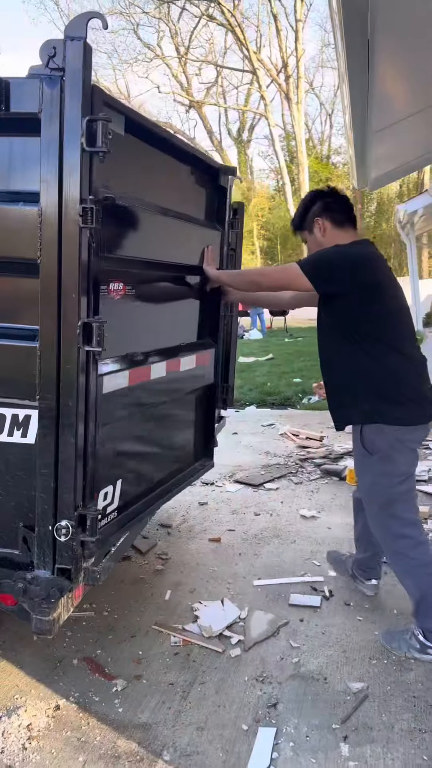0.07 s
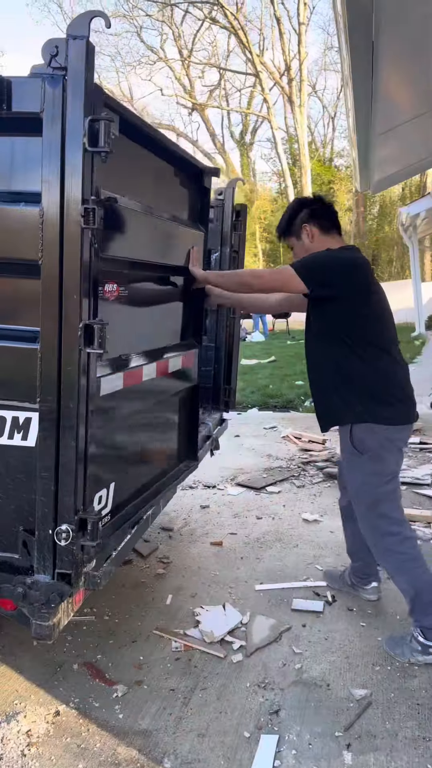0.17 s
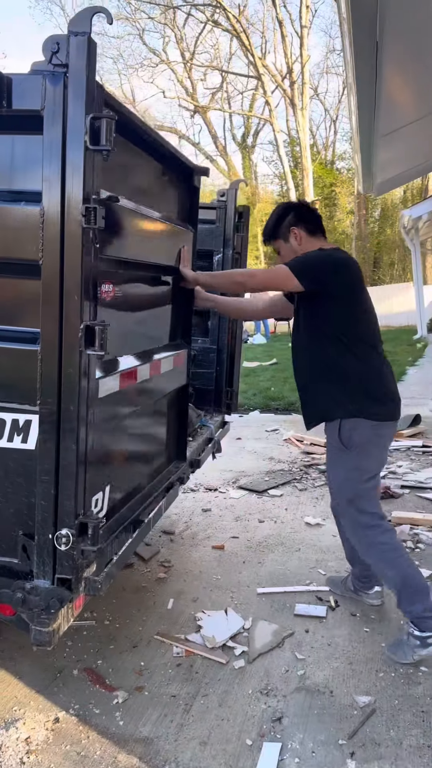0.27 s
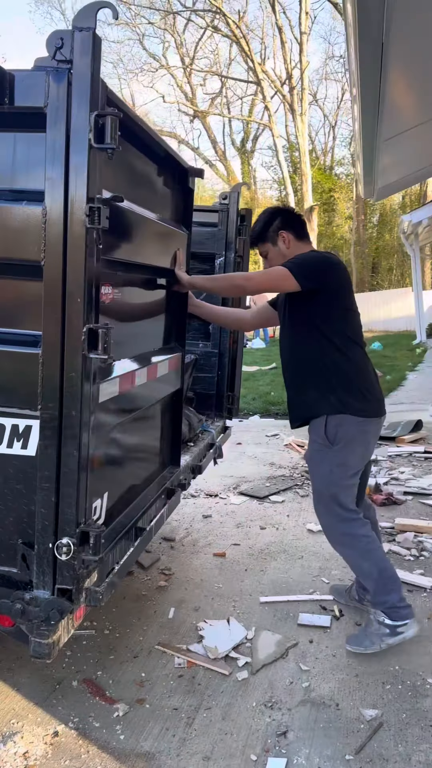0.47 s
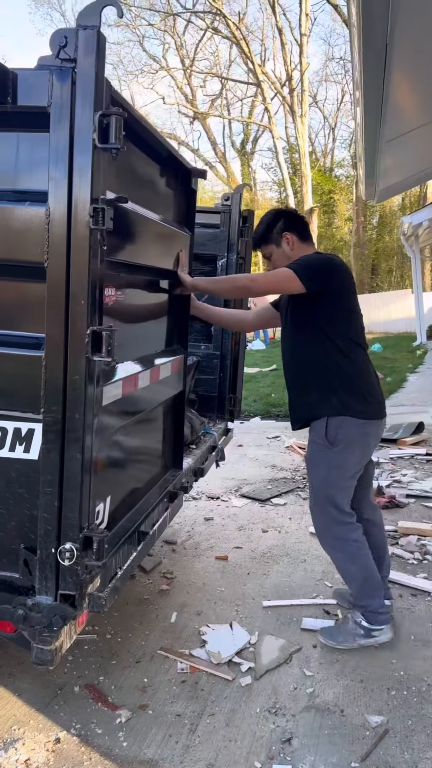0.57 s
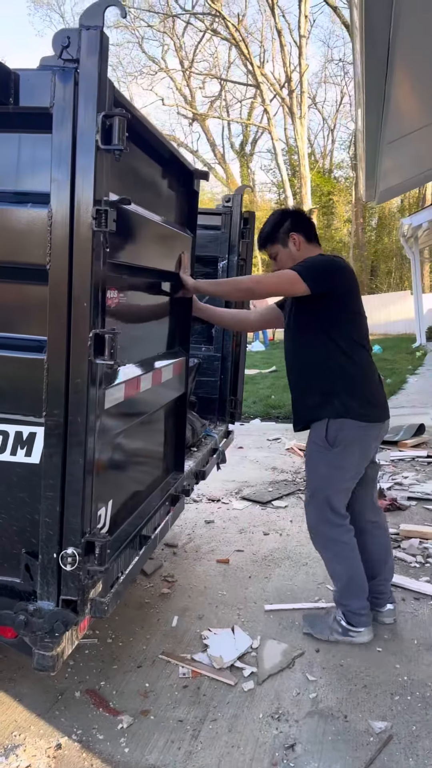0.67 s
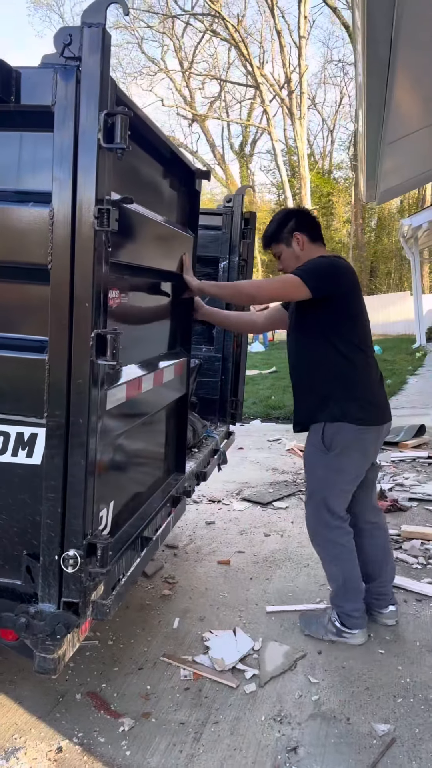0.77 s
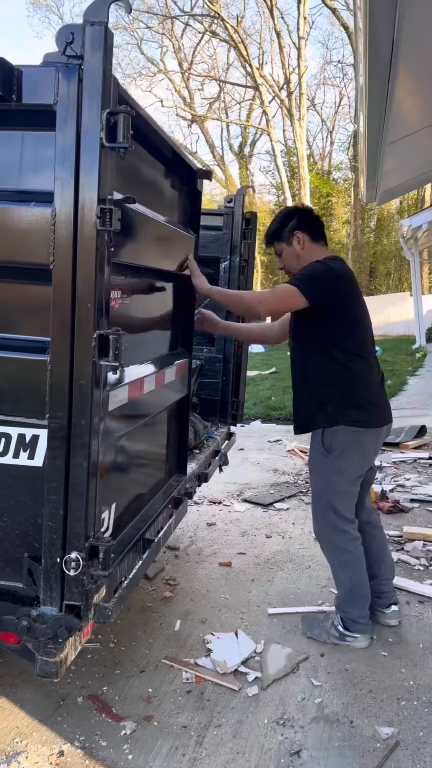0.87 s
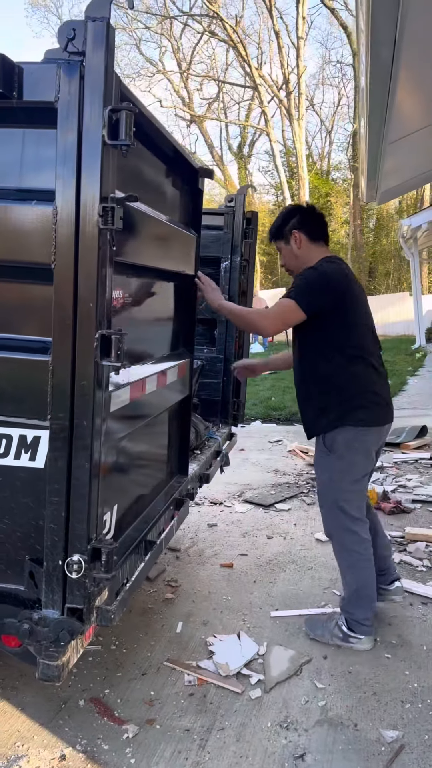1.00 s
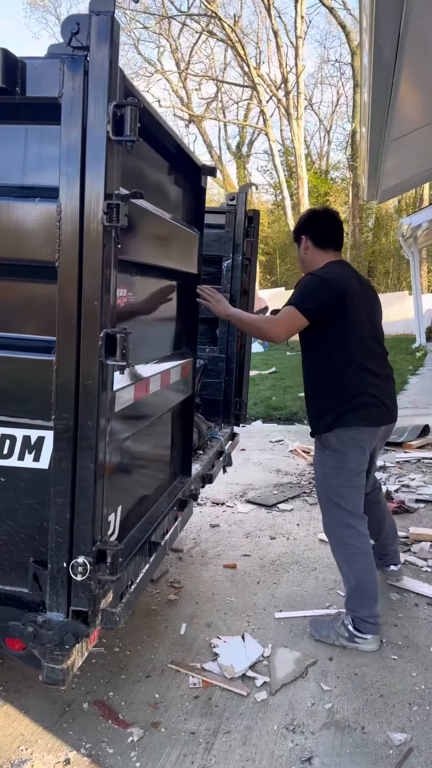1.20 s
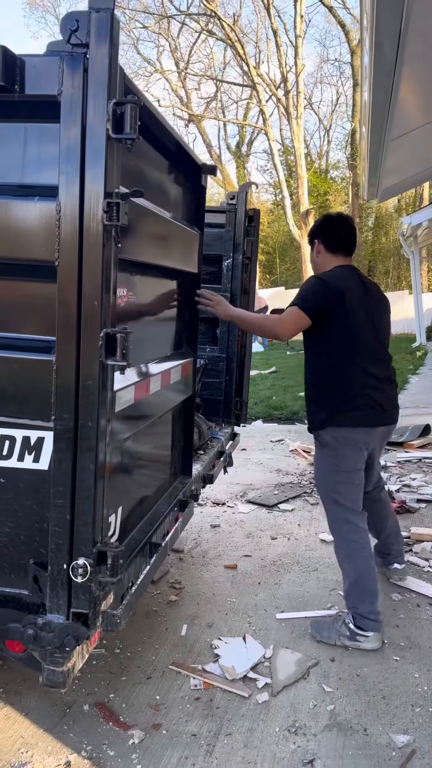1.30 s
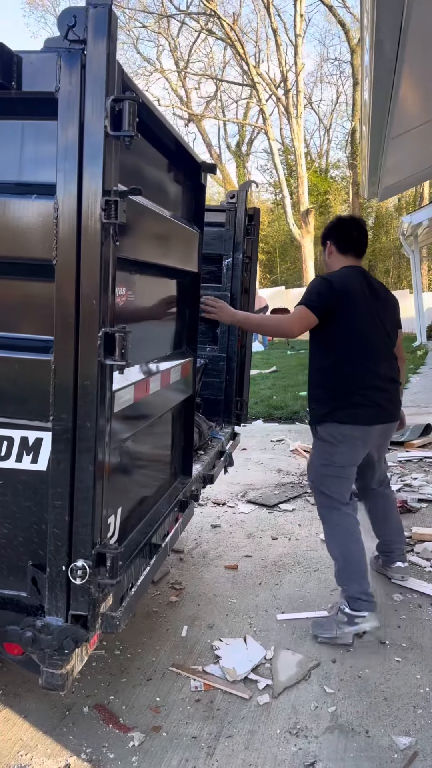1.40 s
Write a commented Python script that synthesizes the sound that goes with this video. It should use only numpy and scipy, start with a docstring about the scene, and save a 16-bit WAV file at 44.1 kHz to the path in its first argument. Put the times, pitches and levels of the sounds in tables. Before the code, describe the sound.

A heavy steel trailer door slams shut at about 0.25 seconds with a crack and a deep boom, just after faint gritty shoe scrapes. It chatters against its frame until 0.5 seconds, panels and loose hardware ringing and fading. Faint latch clanks come around 0.9 seconds, a short scrape at 1.2, and two more light clanks near 1.4. A low outdoor rumble runs underneath.

```python
"""Steel trailer door slam

A heavy steel trailer door is pushed shut outdoors: a brief rush swells into a crack and a boom, then it
chatters for a quarter second, rebounding on its frame, ringing the panels and shaking the loose hardware.
Small latch clanks follow. Gritty shoe scrapes come before and after, over a low outdoor rumble."""
import sys
import numpy as np
from scipy import signal
from scipy.fft import rfft, irfft, next_fast_len
from scipy.io import wavfile

SR = 44100
rng = np.random.default_rng(int(sys.argv[2]) if len(sys.argv) > 2 else 0)


def int16_out(signal):
    """Quantize to a 16-bit WAV file."""
    q = np.round(np.clip(np.atleast_2d(signal).T, -1, 1) * 32767)
    wavfile.write(sys.argv[1], SR, q.astype(np.int16))


N = 63945
T = np.arange(N) / SR
UNEVEN_DB = 1.5   # spread in strength of dense modes
CHATTER_PER_S = 450


# Each row: frequency in Hz, density in dB.
CRACK_SPECTRUM = [(500, -7), (3400, -1), (5000, -13.5), (7000, -16), (9000, -39.5)]
# Each row: frequency in Hz, level in dB.
EDGE_MODES = [(735, -11), (1320, -11.5), (1620, -16), (1850, -13.5)]
SLAM_S, EDGE_T60_S = 0.2437, 0.055
CRACK_DB, CRACK_RISE_S, CRACK_T60_S = -10, 0.0032, 0.045

def slam():
    """First contact: a crack that sweeps down into a thud and briefly rings the door's edge."""
    attack = np.minimum(T / CRACK_RISE_S, 1) ** 2
    fall = np.interp(T - CRACK_RISE_S, T, decay(CRACK_T60_S))
    crack = from_db(CRACK_DB) * noise(CRACK_SPECTRUM, UNEVEN_DB) * attack * fall
    edge = 0
    for hz, db in EDGE_MODES:
        arrival_s = SLAM_S + TRAVEL_1KHZ_S * np.sqrt(1000 / hz)
        edge += mode(hz, EDGE_T60_S, [arrival_s], [db])
    return strike(contacts([SLAM_S], [0]), crack + bending_wave()) + edge


# Each row: frequency along the sweep in Hz, level in dB.
SWEEP_LEVELS = [(110, -14.5), (1000, -11), (3500, -10), (9000, -34.5)]
TRAVEL_1KHZ_S = 0.0066

def bending_wave():
    """Highs travel faster through steel than lows, so one blow arrives as a quick downward sweep."""
    hz = 1000 * (TRAVEL_1KHZ_S / (T + 1 / SR)) ** 2
    low_hz, high_hz = SWEEP_LEVELS[0][0], SWEEP_LEVELS[-1][0]
    in_band = (hz > low_hz) & (hz < high_hz)
    fade = np.clip(hz / low_hz - 1, 0, 1)
    sweep = np.sin(2 * np.pi * np.cumsum(hz * in_band) / SR)
    return in_band * fade * from_db(at_hz(SWEEP_LEVELS, hz)) * sweep


# Each row: start in seconds, level in dB.
BOX_HEAVES = [(0.25, -13), (.45, -27.5), (0.611, -24.5)]
BOOM_HZ, BOOM_RISE_S, BOOM_T60_S = 61.4, 0.008, 0.413

def boom():
    """The whole trailer box heaves in one low mode."""
    tone = np.sin(2 * np.pi * BOOM_HZ * T) * np.minimum(T / BOOM_RISE_S, 1) * decay(BOOM_T60_S)
    return strike(contacts(*np.transpose(BOX_HEAVES)), tone[None])


# Each row: start in seconds, panel level in dB, frame level in dB, hardware level in dB.
DOOR_BLOWS = [(0.2495, -16.5, -20, -45), (.258, -23.5, -28, -25), (.272, -16.5, -15.5, -22.5),
              (0.284, -27.5, -25.5, -16), (.306, -19.5, -17, -21), (.320, -23, -15, -18.5),
              (0.334, -25.5, -22, -23.5), (.352, -37, -16.5, -22.5), (.374, -28.5, -22.5, -28.5),
              (.395, -29.5, -22, -22), (.426, -26, -17.5, -27.5), (.441, -28.5, -23, -29),
              (0.457, -31.5, -32.5, -48), (.479, -30.5, -32.5, -28.5), (.590, -35.5, -49.5, -67)]
# Dense modes of each part. Each row: frequency in Hz, density in dB.
PANEL_SPECTRUM = [(70, -7), (200, -4.5), (320, -6.5), (480, -7), (680, -3.5), (1400, -27)]
FRAME_SPECTRUM = [(550, -25), (900, -3), (1400, -3), (1900, 5), (2600, -2), (3600, -10), (5000, -10),
                  (9000, -58)]
HARDWARE_SPECTRUM = [(1500, -33.5), (3000, 8.5), (4500, -8), (6600, 5), (9400, -8), (13400, -13)]
# Each row: frequency in Hz, T60 in seconds.
STEEL_T60 = [(80, 0.5), (200, 1), (600, 0.66), (1000, 0.52), (2000, 0.22), (9000, 0.13)]
# Each row: frequency in Hz, relative level in dB, T60 in seconds.
DOOR_MODES = [(180.5, -9, 1.0), (211.7, -2.5, 0.63), (236, -16.5, 1.5), (285.2, -11.5, 0.77),
              (334.2, -8, 0.8), (458.5, -13.5, 0.92), (623.7, -10.5, 0.75), (713, -14, .45),
              (1283, -8.5, 0.29), (1518, -10.5, 0.39), (1642, -17, 0.3), (1826, -9.5, .28)]
MODE_GAIN_DB, PANEL_TOP_HZ = -2, 850

def door_rebounds():
    """Each blow on the frame rings panels, frame and loose hardware; a few clear modes stand out."""
    times, panel_db, frame_db, hardware_db = np.transpose(DOOR_BLOWS)
    out = strike(contacts(times, panel_db), noise(PANEL_SPECTRUM, t60s=STEEL_T60))
    for dbs, spectrum in (frame_db, FRAME_SPECTRUM), (hardware_db, HARDWARE_SPECTRUM):
        out += strike(contacts(times, dbs, chatter=True), noise(spectrum, UNEVEN_DB, STEEL_T60))
    for hz, db, t60 in DOOR_MODES:
        drive_db = panel_db if hz < PANEL_TOP_HZ else frame_db
        out += mode(hz, t60, times, drive_db + db + MODE_GAIN_DB)
    return out


# Each row: start in seconds, level in dB, pitch in Hz.
BAR_SHAKES = [(0.251, -20.5, 1025), (0.318, -18.5, 1006), (.346, -15.5, 1008), (0.375, -14.5, 1039)]
BAR_T60_S, BAR_RATTLE_DB = 0.27, 1
HUM_RELATIVE_DB, HUM_T60_S = -37, 3.4

def locking_bar():
    """Each shake rings the loose bar harder, slightly retuned; the rings beat and a faint hum lingers."""
    rings = sum(mode(hz, BAR_T60_S, [s], [db]) for s, db, hz in BAR_SHAKES)
    rattle = from_db(BAR_RATTLE_DB * wander(T * CHATTER_PER_S))
    s, db, hz = BAR_SHAKES[-1]
    hum = mode(hz, HUM_T60_S, [s], [db + HUM_RELATIVE_DB])
    return rings * rattle + hum


# Each row: start in seconds, knock level in dB, clink level in dB, tick level in dB.
LATCH_CLANKS = [(0.853, -52, -45, -53), (0.930, -53, -43.5, -67), (1.3451, -37, -46, -55),
                (1.433, -47, -57, -48.5)]
# Each row: frequency in Hz, density in dB.
KNOCK_SPECTRUM = [(150, -14), (480, 16), (750, -1), (1500, -24)]
CLINK_SPECTRUM = [(700, 0), (1700, -1), (3500, -11), (8000, -21.5)]
KNOCK_T60_S, CLANK_T60_S = 0.074, 0.076

def latch():
    """Light clanks: a dull knock in the door, a clink of the bar, a tick of the hardware."""
    times, knock_db, clink_db, tick_db = np.transpose(LATCH_CLANKS)
    knock = strike(contacts(times, knock_db), noise(KNOCK_SPECTRUM) * decay(KNOCK_T60_S))
    clink = strike(contacts(times, clink_db), noise(CLINK_SPECTRUM, UNEVEN_DB) * decay(CLANK_T60_S))
    tick = strike(contacts(times, tick_db), noise(HARDWARE_SPECTRUM, UNEVEN_DB) * decay(CLANK_T60_S))
    return knock + clink + tick


# Each row: frequency in Hz, level in dB.
TINK_MODES = [(8050, -46.5), (8700, -54.5)]
TINK_S, TINK_T60_S = 1.008, 0.096

def tink():
    """A small loose part rings once, thin and buzzing."""
    buzz = wander(T * CHATTER_PER_S)
    return buzz * sum(mode(hz, TINK_T60_S, [TINK_S], [db]) for hz, db in TINK_MODES)


# Each row: peak time, rise and fall time constants in seconds, body and grit levels in dB.
# The row at 0.246 s is a brief rush of noise swelling into the slam's crack; the rest are scrapes.
NOISE_SWELLS = [(0.072, 0.04, 0.029, -58, -47.5), (0.165, 0.02, 0.05, -49.5, -52.5),
                (0.246, 0.0048, 0.0061, -26.5, -43), (0.744, 0.16, 0.081, -53.5, -61.5),
                (.88, 0.061, 0.16, -59, -61.5), (1.202, 0.0057, 0.027, -38.5, -52.5),
                (1.232, 0.0066, 0.02, -33, -30), (1.334, 0.046, 0.08, -53, -57.5)]
# Each row: frequency in Hz, density in dB.
BODY_SPECTRUM = [(400, 2), (800, -9), (2100, 7), (2900, -3), (6000, -4.5)]
GRIT_SPECTRUM = [(1500, -9.5), (3800, 1), (7000, 3), (13400, -6)]
# Each row: start in seconds, level in dB.
GRIT_CLICKS = [(0.06, -48.5), (.137, -45.5), (0.157, -45.5), (0.213, -45)]
GRAINS_PER_S, GRAIN_DEPTH_DB, GRIT_T60_S = 1100, 2, 0.035

def scrapes_and_rush():
    """Grainy scrapes of shoes and metal, single ticks of grit, and a rush of noise into the crack."""
    body_gain, grit_gain = 0, 0
    for peak_s, rise_s, fall_s, body_db, grit_db in NOISE_SWELLS:
        swell = np.exp(-np.maximum((peak_s - T) / rise_s, (T - peak_s) / fall_s))
        body_gain += swell * from_db(body_db)
        grit_gain += swell * from_db(grit_db)
    grains = from_db(GRAIN_DEPTH_DB * np.tanh(wander(T * GRAINS_PER_S)))
    ticks = strike(contacts(*np.transpose(GRIT_CLICKS)), noise(BODY_SPECTRUM) * decay(GRIT_T60_S))
    body = body_gain * noise(BODY_SPECTRUM, UNEVEN_DB)
    grit = grit_gain * noise(GRIT_SPECTRUM, UNEVEN_DB)
    return ticks + grains / rms(grains) * (body + grit)


# Each row: frequency in Hz, density in dB.
RUMBLE_SPECTRUM = [(25, -27.5), (45, -2), (70, -0.5), (110, -6.5), (400, -29), (900, -32), (1800, -52),
                   (13000, -73)]
RUMBLE_DB = -35.5

def outdoor_rumble():
    """Steady low background noise."""
    return from_db(RUMBLE_DB) * noise(RUMBLE_SPECTRUM)


CHATTER_TAU_S, CHATTER_DB = 0.0067, -3.5

def contacts(times, dbs, chatter=False):
    """One click per contact, with a dying trail of tiny ones if it chatters."""
    out = np.zeros(N)
    for s, db in zip(times, dbs):
        trail = rng.standard_normal(N) * (rng.random(N) < CHATTER_PER_S / SR)
        trail *= np.exp(-T / CHATTER_TAU_S) * from_db(CHATTER_DB) * chatter
        trail[0] = rng.choice([-1, 1])
        start = int(s * SR)
        out[start:] += from_db(db) * trail[:N - start] / np.linalg.norm(trail)
    return out


def strike(clicks, response):
    """Every click sets the response going."""
    return signal.fftconvolve(clicks[None], response, axes=1)[:, :N]


# Each row: frequency in Hz, left-right correlation, left minus right in dB.
STEREO_IMAGE = [(297, 0.92, -0.5), (700, 0.47, 7), (1324, 0.82, 1.5), (2430, 0.77, 1), (4500, 0.14, 0),
                (8000, 0.97, 0.5)]
SIDES = np.array([[1], [-1]])
UNEVEN_OCTAVES, WAVER_RAD = 0.02, 0.48

def noise(spectrum, uneven_db=0, t60s=None):
    """Stereo noise in half-octave bands, starting at rms 1; given ring times, each band dies away."""
    edges = 22 * 2 ** np.arange(0, 9.6, 0.5)
    size, steady, out = next_fast_len(N + 4096), 0, 0
    octaves = np.log2(1 + np.arange(size // 2 + 1))
    bins = rfft(rng.standard_normal((2, 2, size)))
    narrow_peaks = from_db(uneven_db * wander(octaves / UNEVEN_OCTAVES))
    source = irfft(bins * narrow_peaks, size)
    for k, (low, high) in enumerate(zip(edges, edges[1:])):
        hz = np.sqrt(low * high)
        if not spectrum[0][0] / 2 < hz < spectrum[-1][0] * np.sqrt(2):
            continue
        bandpass = signal.butter(2, [low, high], "band", fs=SR, output="sos")
        mid, side = signal.sosfilt(bandpass, source[k % 2])[:, -N:]
        correlation = at_hz(STEREO_IMAGE, hz)
        band = np.sqrt(1 + correlation) * mid + np.sqrt(1 - correlation) * side * SIDES
        band *= from_db(at_hz(spectrum, hz)) * balance(hz)
        steady += band
        out += band * (1 if t60s is None else decay(at_hz(t60s, hz)))
    return out / rms(steady)


def mode(hz, t60, times, dbs):
    """One clear mode, wavering in phase: each blow adds to its energy, which then dies away."""
    retained = 10 ** (-6 / (t60 * SR))
    energy = signal.lfilter([1], [1, -retained], contacts(times, dbs) ** 2 + 1e-18)
    phase = 2 * np.pi * (hz * T + rng.random()) + WAVER_RAD * wander(T * 10 / t60)
    return balance(hz) * np.sqrt(energy) * np.sin(phase)


def balance(hz):
    """Left and right gains at one frequency."""
    return from_db(SIDES * at_hz(STEREO_IMAGE, hz, column=2) / 2)


def decay(t60):
    """Exponential decay from 1."""
    return np.exp(-np.log(1000) * T / t60)


def wander(steps):
    """Random values, one per unit step, joined by lines."""
    return np.interp(steps, np.arange(N), rng.standard_normal(N))


def at_hz(table, hz, column=1):
    """Read a table on a log-frequency axis."""
    table = np.array(table)
    return np.interp(np.log(hz), np.log(table[:, 0]), table[:, column])


def from_db(db):
    """Decibels to gain."""
    return 10 ** (np.asarray(db) / 20)


def rms(x):
    """Root mean square."""
    return np.sqrt(np.mean(x ** 2) + 1e-20)


def scene():
    """Door, latch and scrapes over the outdoor rumble."""
    door = slam() + boom() + door_rebounds() + locking_bar()
    return door + latch() + tink() + scrapes_and_rush() + outdoor_rumble()


LEFT_LAG_SAMPLES, MONO_BELOW_HZ = 1.186, 280
TREBLE_EDGE_HZ, TOP_MID_DB, CUTOFF_HZ = 9510, -44, 16000

def record(dry):
    """Left lags slightly and peaks are rounded; the bass is mono, the top treble in antiphase."""
    late_left = np.interp(T - LEFT_LAG_SAMPLES / SR, T, dry[0])
    left, right = np.tanh([late_left, dry[1]])
    mid, side = (left + right) / 2, (left - right) / 2
    side = signal.sosfilt(signal.butter(3, MONO_BELOW_HZ, "high", fs=SR, output="sos"), side)
    lower_mid = signal.sosfiltfilt(signal.butter(10, TREBLE_EDGE_HZ, fs=SR, output="sos"), mid)
    mid = lower_mid + from_db(TOP_MID_DB) * (mid - lower_mid)
    lowpass = signal.ellip(10, 0.1, 80, CUTOFF_HZ, fs=SR, output="sos")
    return signal.sosfilt(lowpass, [mid + side, mid - side])


dry = scene()
out = record(dry)
int16_out(out)
```